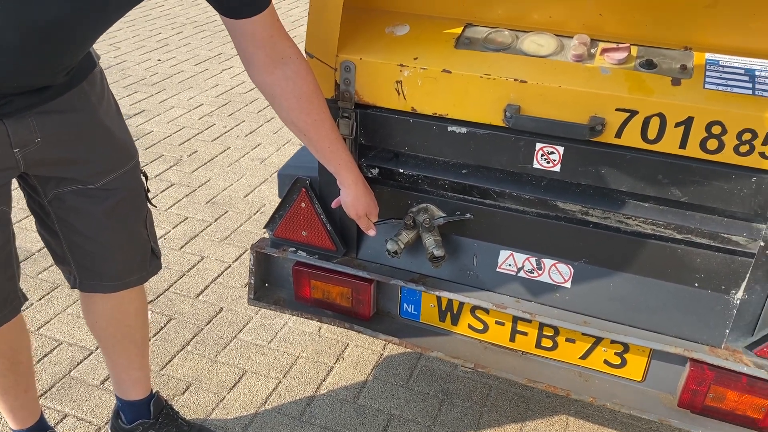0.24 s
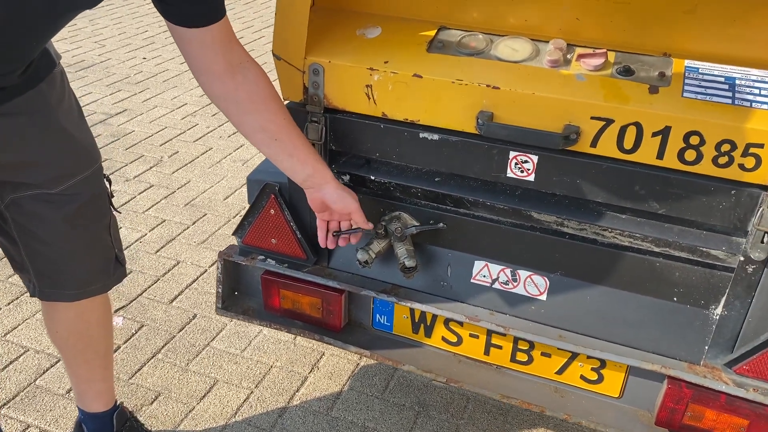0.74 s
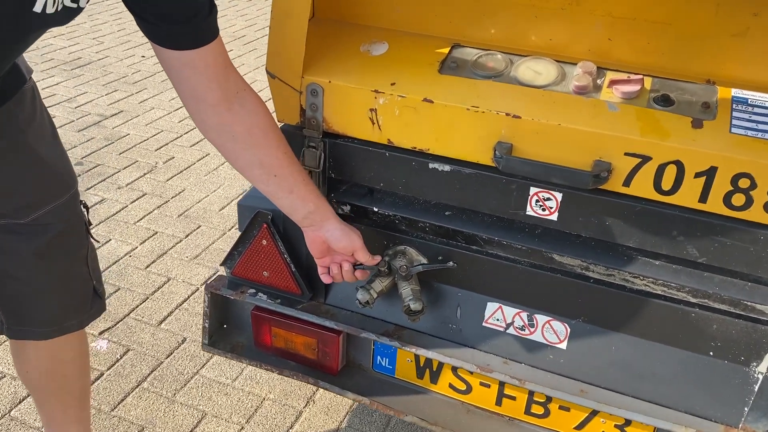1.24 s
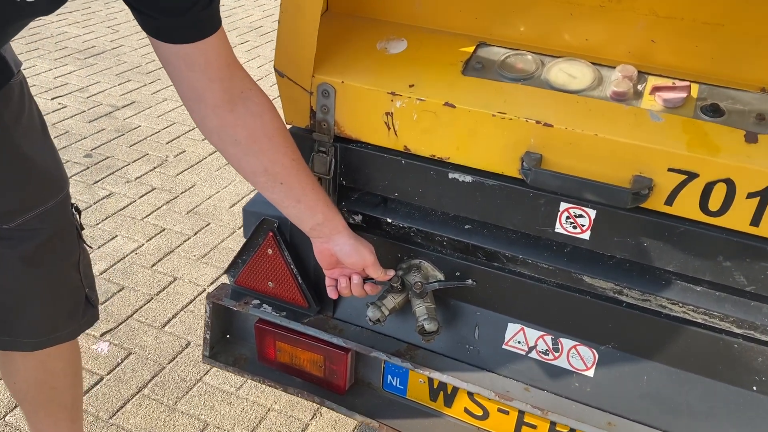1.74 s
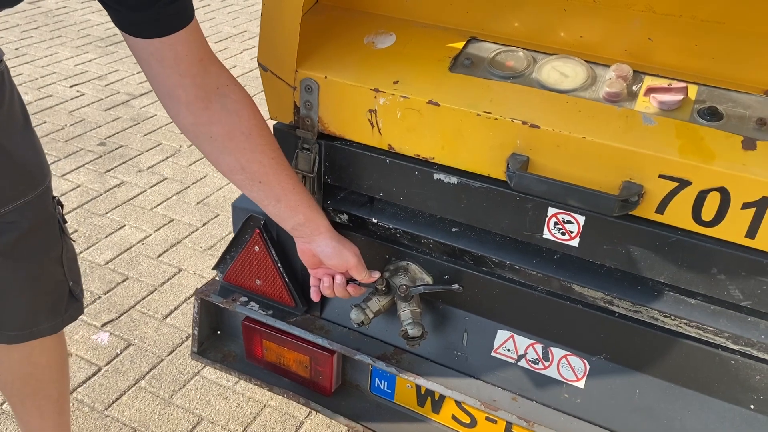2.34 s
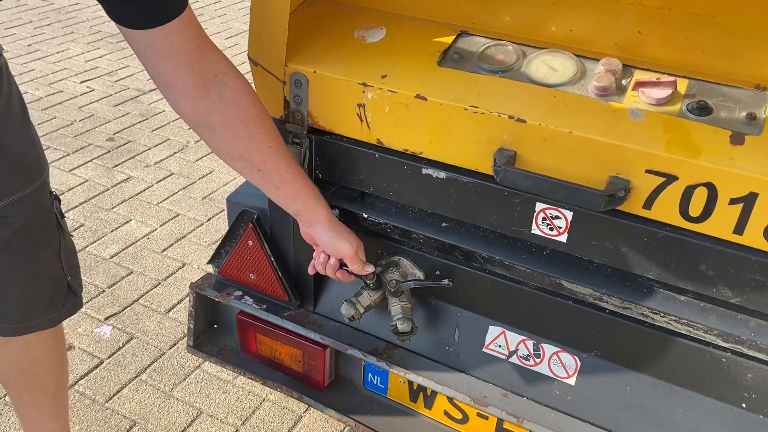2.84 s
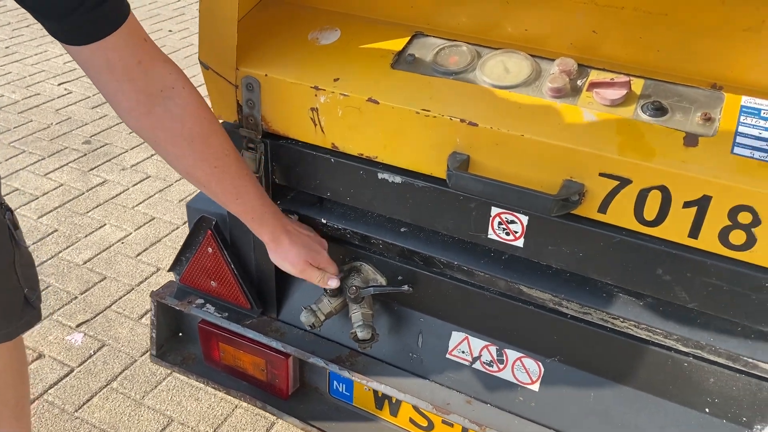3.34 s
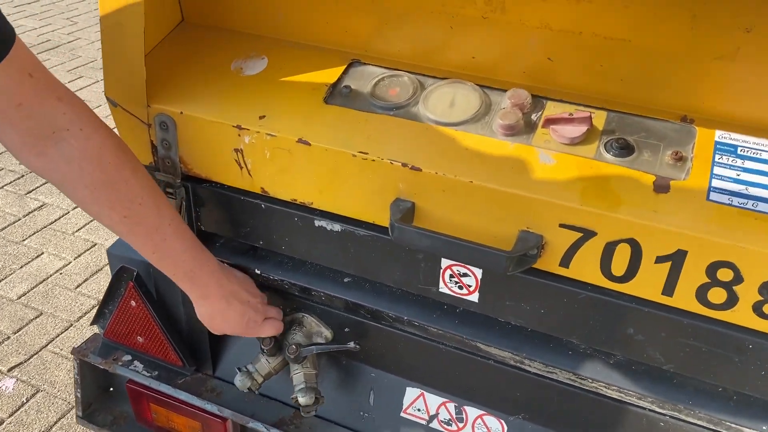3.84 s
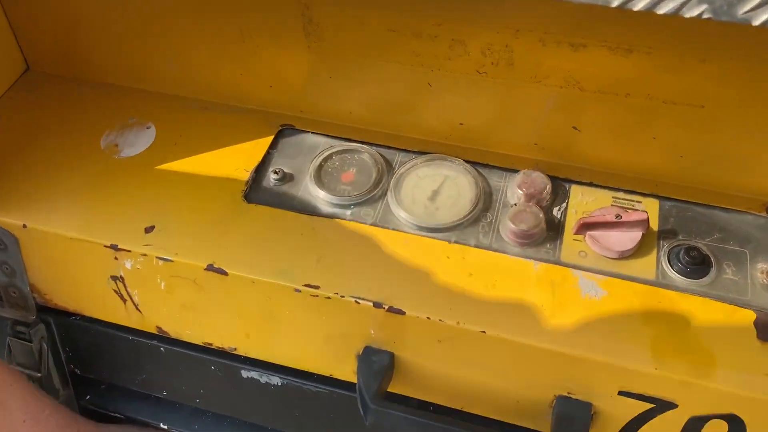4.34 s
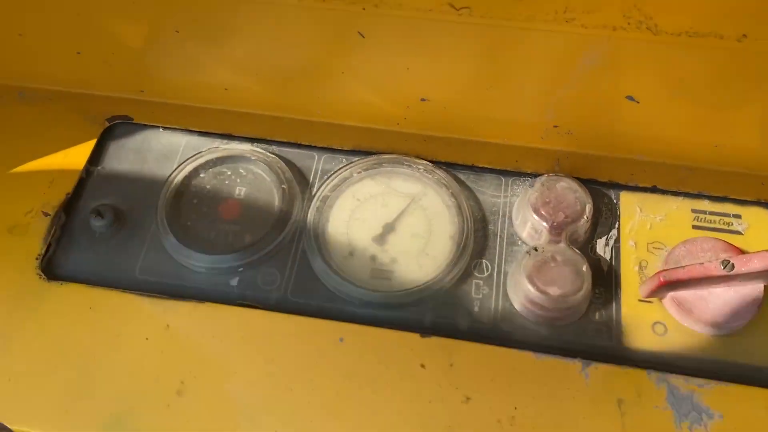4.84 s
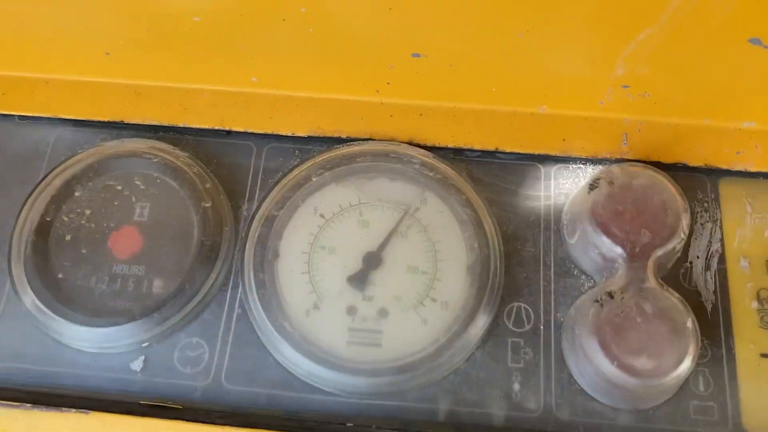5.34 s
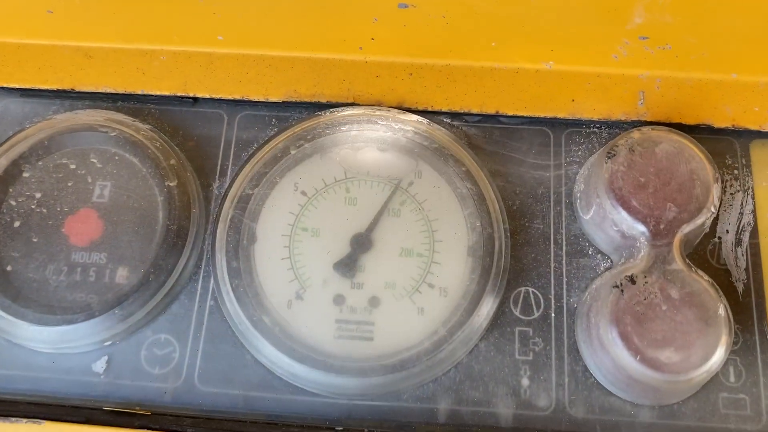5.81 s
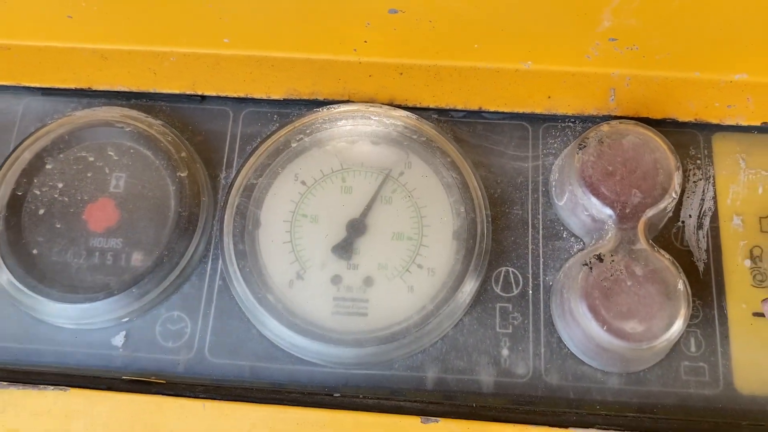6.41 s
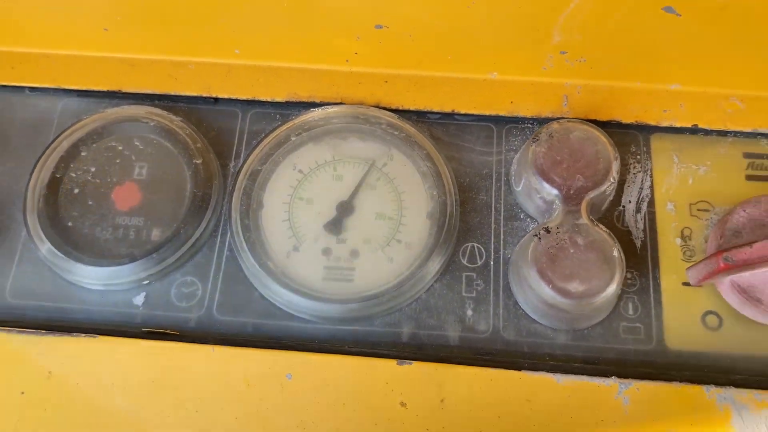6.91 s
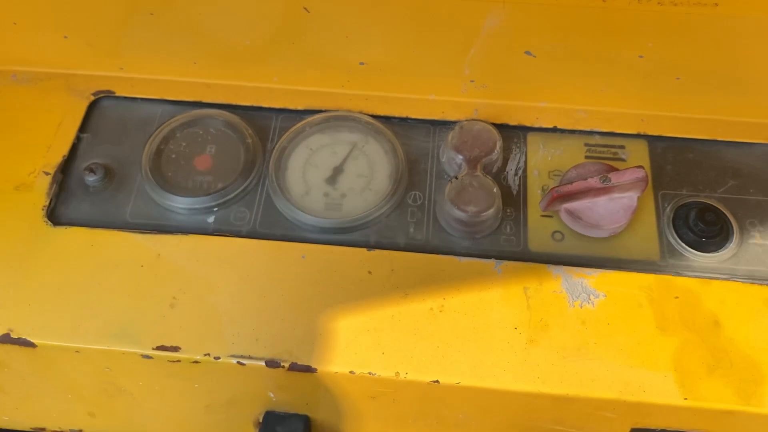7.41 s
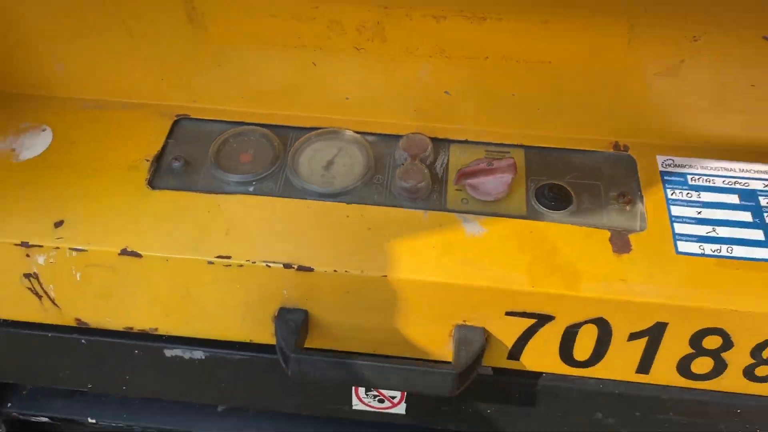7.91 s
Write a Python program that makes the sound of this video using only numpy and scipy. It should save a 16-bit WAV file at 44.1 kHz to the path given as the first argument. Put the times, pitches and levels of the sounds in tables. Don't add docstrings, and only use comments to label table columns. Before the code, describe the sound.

From 0 to about 2.7 s, a loud, steady jet of compressed air roars and hisses from an outlet valve, bright and turbulent with a hollow pipe colour, almost burying a fast-running diesel. From 2.7 s the closing gap makes the jet weaker and more nasal; just before 3.1 s very high thin whistles flare, and everything airy snaps off, leaving only a tiny leak. The small diesel, at first subdued, swells up between 3.1 and 3.7 s, thumping steadily with gear whine. Around 4.4 to 5 s its speed and whine slide down, with a brief surge, into a slow lumpy idle. The stereo microphone moves to the metal housing, so thump, panel rumble, uneven knocking clatter and whine get loud and close from 5 to 7 s. A short, brighter mechanical swell passes near 7 s, then the engine recedes somewhat until 8.2 s, still idling outdoors.

```python
import sys
import numpy as np
from scipy import signal
from scipy.fft import rfft, irfft, next_fast_len
from scipy.io import wavfile
from scipy.ndimage import uniform_filter1d

SR = 44100
rng = np.random.default_rng(int(sys.argv[2]) if len(sys.argv) > 2 else 0)


def materialize(psi):
    bounded = np.clip(np.atleast_2d(psi).T, -1, 1)
    quanta = np.round(bounded * 32767).astype(np.int16)
    wavfile.write(sys.argv[1], SR, quanta)


def amplitude_ratio(level_db):
    exponent = np.asarray(level_db, float) / 20
    return 10 ** exponent


N = 360297
T = np.arange(N) / SR
HZ = np.fft.rfftfreq(1024, 1 / SR)
FRAME_S = np.arange(N // 256 + 5) * 256 / SR

# t/s, rate/(cycles/s)
SPEED = [(0, 22.4), (3.4, 22.38), (4.07, 22.1), (4.4, 21.9), (4.55, 21.0), (4.7, 19), (4.8, 17.4),
         (4.89, 16), (5, 14.7), (5.2, 14.4), (5.5, 14.6), (6.8, 14.54), (7.2, 14.47), (8.17, 14.52)]
# t/s, share/1
NEAR = [
    (4.55, 0),
    (4.69, .92),
    (5.05, 1),
]
VALVE_HZ, HOUSING_HZ = 22.1, 14.55
PATH_CYCLES = .477

# f/Hz, density/dB
JET_COLOUR = [(150, -33.5), (500, -34), (1100, -27.5), (2700, -22.5), (3500, -17), (3900, -6), (6500, -9.5),
              (7700, -13.5), (8000, -1.5), (9500, -7.5), (13000, -8), (15600, -12), (15900, -69)]
# f/Hz, width/Hz, level/dB
JET_MODES = [(1680, 400, 7.5), (2760, 210, -6), (3120, 160, 2), (4070, 300, 6), (4600, 200, 0),
             (5310, 200, 3), (6120, 230, 1.5), (8560, 170, 4.5), (10130, 150, 3.5), (10850, 250, 1.5),
             (12960, 300, 3)]
# f/Hz, likeness/1
JET_SAME = [(700, 1), (1400, 0.88), (2000, .9), (2700, 0.59), (4000, 0.9), (5500, 0.55), (6200, 1),
            (6600, 0.99), (16000, 0.99)]
# f/Hz, level/dB
JET_LEFT = [(1000, -1.5), (2500, 1), (4500, 3.5), (6000, 3.5), (6800, 0.5)]
# t/s, jet level/dB
OPENING = [
    (0, -29),
    (.3, -28.5),
    (2.66, -28),
    (2.74, -31.5),
    (2.99, -34.5),
    (3.075, -38.5),
    (3.09, -53.5),
    (3.12, -57),
    (3.2, -84),
]
# t/s, share/1
CLOSING = [
    (2.62, 0),
    (2.75, 0.7),
    (3.05, 1),
]
# f/Hz, level/dB
NARROWED = [(300, -8.5), (600, -7), (1200, 4), (1700, 11), (2400, -1), (3500, -2), (4400, 3), (5200, -3),
            (6500, -8.5), (9000, 4)]
TOP_DB, TOP_NARROWED_DB, TOP_SHUT_DB = -0.5, -2.5, -5.5
FACING_S, FACING_HALF_S, FACING_DB = 1.9, 0.77, 1.5

# f/Hz, width/Hz, peak level/dB, rise/(dB/s), leak level/dB
WHISTLES = [
    (9600, 54, -34, 169.5, -71),
    (15000, 60, -41, 1200, -74),
]
SHUT_S, CUT_DB_PER_S, LEAK_FADE_DB_PER_S2 = 3.074, 1498, 900

# order of the cycle/1, level/dB
AT_VALVE = [(1, -44), (2, -25), (3, 0.5), (4, -0.5), (5, -12), (6, -27), (7, -16), (8, -15), (9, -16),
            (10, -32), (11, -13.5), (12, -28), (13, -35), (14, -37.5)]
# order of the cycle/1, level/dB
AT_HOUSING = [(1, -54.5), (2, -40.5), (3, -11.5), (4, 0.5), (5, -20), (6, -25), (7, -16), (8, -5.5),
              (9, -34), (10, -37.5), (11, -34), (12, -18.5), (13, -25), (14, -30.5), (15, -22.5), (16, -18),
              (17, -44), (18, -30), (19, -43.5), (20, -40.5)]
# t/s, factor/1
PIPE = [
    (4.45, 1.2),
    (4.65, 1.09),
    (4.9, 1.09),
    (5.1, 0.99),
]
SURGE_S, SURGE_HALF_S, SURGE_DB = 4.66, .06, 3.5
COAST_S, COAST_HALF_S, COAST_DB = 4.72, 0.08, -7.5

# f/Hz, density/dB
RUMBLE = [(30, -28.5), (45, -13.5), (75, -15), (130, -16), (170, -19.5), (240, -21.5), (290, -26),
          (650, -32), (735, -46), (830, -36.5), (1570, -52), (2500, -56), (3300, -89)]
# f/Hz, width/Hz, level/dB
PANELS = [(257, 12, 2), (327.5, 9.2, 4.5), (374.4, 18, 1), (466, 62, 3.5), (517.4, 20, -3.5),
          (574.4, 27, -4.5), (653.3, 8.4, -3), (806, 10, -7), (877, 28, -8), (980, 42, -14.5),
          (1300, 50, -13)]
BLOCK_HZ, BLOCK_DB = (300, 1048), -3.5

# f/Hz, density/dB
CLATTER = [(500, -8.5), (1000, 2), (1800, -4.5), (2300, -4), (3000, -6), (3500, -6), (4200, -10.5),
           (5200, -12.5), (6500, -16.5), (9000, -20.5), (12500, -23.5), (15600, -36.5), (15900, -71)]
# f/Hz, level/dB
FAST_COLOUR = [(700, 4), (1100, -3.5), (1500, 1.5), (2000, -6), (2500, -1), (3400, -1), (4300, 0.5),
               (5200, 3), (6200, -3.5), (8000, 1)]
KNOCKS = [
    (-.25, 1.1),
    (-.03, 1.05),
    (.18, .3),
    (.4, .15),
]
KNOCK_RISE, KNOCK_FALL, KNOCK_LATE = .045, .14, .28

# order of the cycle/1, width/Hz, fast level (weighs 1.5 fast, 0.5 at idle)/dB, level
# added at idle/dB
WHINE = [(28, 9.9, -5, -10.5), (29.4, 12, -8, -18), (42.6, 40, -9, -23), (94, 50, -30.5, -5),
         (59.8, 25, -4, -15.5), (74, 30, -11, -18), (111.7, 27, -5.5, -26.5), (116.5, 40, -5, -21),
         (125, 30, -9, -24.5), (224, 120, -9, -16), (232.4, 150, -5, -9), (340, 310, -12, -8.5),
         (140, 81, -31, 6), (241.6, 110, -28, 5.5)]
# f/Hz, half-width/Hz, level/dB
PANEL_LIFTS = [(520, 28, 11.5), (1260, 45, 5.5), (1430, 35, 9)]

# f/Hz, likeness/1
ENGINE_SAME = [(100, 0.57), (400, 0.63), (800, 0.26), (2000, 0.43), (5500, 0.61), (6600, 0.65),
               (6900, 0.99), (16000, 0.83)]
# f/Hz, level/dB
ENGINE_LEFT = [(1000, -1.5), (4500, 3), (7000, 0.5)]
# t/s, level/dB
CLOSENESS = [(3.66, 0.5), (4.5, 1.5), (4.9, 3), (5.15, 7), (5.75, 9), (6.87, 8), (8.08, 3.5), (8.17, 1)]
# t/s, half-length/s, share/1
VENT_PASSES = [
    (4.3, 0.4, 1.03),
    (5.05, .12, .7),
    (7.05, .25, 1.1),
]
# far/dB, held down under the jet/dB, closeness share/1, idle change/dB, vent/dB
THUMP_LAW = (-33.5, -18, 1.03, -0.03, 0.3)
RUMBLE_LAW = (-61.5, -17, 1.7334, -0.47, 2)
CLATTER_LAW = (-59.5, -9, 0.9348, -9.5, 1.5)
WHINE_LAW = (-62.5, -10.5, .4, -4.5, 4.5)
RELEASE_S, RECOVERY_S, CREEP_DB_PER_S = 2.98, 0.65, 0.94
HUSH_S, HUSH_HALF_S, HUSH_DB = 3.2, .3, -21
HUSH_BELOW_HZ, HUSH_SHARE = 1200, 0.3

# f/Hz, phase/rad
RIGHT_TURN = [(0, 0), (1300, -.1), (2500, -.05), (4300, -.4), (5800, -.1), (7100, 0), (8900, 3.14),
              (9200, 3.14), (11000, 6.28), (11500, 6.28), (13150, 9.42), (13600, 9.42), (15000, 12.4),
              (16000, 12.56)]
MONO_EDGE_HZ, MONO_SINK_S, MONO_SINK_HZ_PER_S, MONO_JITTER_HZ = 1170, 2.98, 307, 50


def evened(x):
    return x / np.sqrt(np.mean(x ** 2) + 1e-20)


def read(points, hz):
    f, value = np.transpose(points)
    return np.interp(np.log(hz + 1), np.log(f + 1), value)


def curve(rows, column=1, t=T):
    rows = np.asarray(rows, float)
    return np.interp(t, rows[:, 0], rows[:, column])


def bump(s, half_s, t=T):
    return np.exp(-((t - s) / half_s) ** 2)


def wander(rate, t=T):
    return evened(np.interp(t, np.arange(200) / rate, rng.standard_normal(200)))


def noise(field_db, same, left_db, patchy_db, streaky_db, flicker_db):
    a, b, c, d, patch, streak, flick = rng.standard_normal((len(FRAME_S), len(HZ), 7)).T
    patch = uniform_filter1d(uniform_filter1d(patch, size=10, axis=0), size=6, axis=1)
    streak = uniform_filter1d(uniform_filter1d(streak, size=2, axis=0), size=40, axis=1)
    flick = uniform_filter1d(flick, size=240, axis=0)
    rough_db = patchy_db * evened(patch) + streaky_db * evened(streak) + flicker_db * evened(flick)
    like = np.clip(read(same, HZ), -1, 1)[:, None]
    tilt = amplitude_ratio(read(left_db, HZ) / 2)[:, None]
    left = a + 1j * b
    right = like * left + np.sqrt(1 - like ** 2) * (c + 1j * d)
    z = np.array([tilt * left, right / tilt]) * amplitude_ratio(field_db + rough_db)
    return evened(signal.istft(z, nperseg=1024, noverlap=768)[1][:, :N])


def fuzzy_line(turns, width):
    slow, r = np.arange(N // 32 + 2) * 32, np.exp(-np.pi * width * 32 / SR)
    parts = signal.lfilter([1], [1, -2 * r, r * r], rng.standard_normal((4, len(slow))))
    a, b, c, d = (np.interp(np.arange(N), slow, p) for p in evened(parts))
    cos, sin = np.cos(2 * np.pi * turns), np.sin(2 * np.pi * turns)
    return (a + 25 / width) * cos + b * sin, c * cos + d * sin


def cycles(near):
    return np.cumsum(curve(SPEED)) / SR - .04 - PATH_CYCLES * near


def heard_db(far_db, held_db, close, idle_db, vent_db):
    held = np.clip(1 - (T - RELEASE_S) / RECOVERY_S, 0, 1)
    creep_db = CREEP_DB_PER_S * np.minimum(T - RELEASE_S, 0)
    idle = np.clip((VALVE_HZ - curve(SPEED)) / (VALVE_HZ - HOUSING_HZ), 0, 1)
    vent = sum(share * bump(s, half_s) for s, half_s, share in VENT_PASSES)
    return far_db + held_db * held + creep_db + close * curve(CLOSENESS) + idle_db * idle + vent_db * vent


def jet():
    pipe_db = 0
    for hz, width, db in JET_MODES:
        mode_hz = hz * (1 + 0.0074 * wander(rate=3, t=FRAME_S))
        pipe_db = pipe_db + db / (1 + (2 * (HZ[:, None] - mode_hz) / width) ** 2)
    narrow = curve(CLOSING, t=FRAME_S)
    top_db = TOP_DB + TOP_NARROWED_DB * narrow + FACING_DB * bump(FACING_S, FACING_HALF_S, FRAME_S)
    top_db += TOP_SHUT_DB * np.clip((FRAME_S - SHUT_S) / 0.063 + 1, 0, 1)
    top = np.clip((HZ - 7000) / 1200, 0, 1)
    field_db = read(JET_COLOUR, HZ)[:, None] + pipe_db + top[:, None] * top_db
    field_db += read(NARROWED, HZ)[:, None] * narrow
    air = noise(field_db, JET_SAME, JET_LEFT, patchy_db=1.0, streaky_db=2.5, flicker_db=0.56)
    air /= np.std(signal.lfilter(*signal.butter(3, [3300, 7300], "bandpass", fs=SR), air))
    shut = np.clip((3.17 - T) / .09, 0, 1)
    return amplitude_ratio(curve(OPENING) + 0.77) * air * shut


def thump():
    near = curve(NEAR, t=FRAME_S)
    turns_valve, turns_housing = cycles(near=0), cycles(near=0.97)
    pitch = curve(SPEED, t=FRAME_S) / curve(PIPE, t=FRAME_S)
    at_valve = [(k * VALVE_HZ, db) for k, db in AT_VALVE]
    at_housing = [(k * HOUSING_HZ, db) for k, db in AT_HOUSING]
    coast_db = COAST_DB * bump(COAST_S, COAST_HALF_S, FRAME_S)
    out, power = np.zeros(N), 0
    for k in range(2, 21):
        sway = amplitude_ratio(1.6 * wander(rate=6, t=FRAME_S) * (k > 4) + coast_db * (k > 9))
        far = (1 - near) * sway * amplitude_ratio(read(at_valve, k * VALVE_HZ))
        close = near * sway * amplitude_ratio(read(at_housing, k * pitch))
        trail = np.sqrt(max(k - 4, 0))
        chance = (k > 8) * 2 * np.pi * rng.random()
        valve_wave = np.cos(2 * np.pi * k * turns_valve - 1.04 * trail - chance)
        housing_wave = np.sin(2 * np.pi * k * turns_housing - 0.24 * trail - chance)
        out += np.interp(T, FRAME_S, far) * valve_wave + np.interp(T, FRAME_S, close) * housing_wave
        power += (far ** 2 + close ** 2) / 2
    level_db = heard_db(*THUMP_LAW) + SURGE_DB * bump(SURGE_S, SURGE_HALF_S)
    out *= amplitude_ratio(level_db) / np.interp(T, FRAME_S, np.sqrt(power))
    wide = amplitude_ratio(-24.5) * np.roll(out, 190)
    return np.array([out + wide, out - wide])


def rumble():
    near = curve(NEAR)
    fired = np.diff(np.floor(cycles(near)), prepend=0) * amplitude_ratio(.6 * rng.standard_normal(N))
    ring = np.zeros((2, 9000))
    for (hz, width, db), (moment, turn) in zip(PANELS, rng.random((len(PANELS), 2))):
        t = np.maximum(np.arange(9000) / SR - .068 * moment, 0)
        shape = np.sqrt(width) * np.exp(-np.pi * width * t) * np.minimum(t / 0.0041, 1)
        ring += amplitude_ratio(db) * shape * np.sin(2 * np.pi * hz * t + [[0], [hz / 600 * turn]])
    knock = evened(signal.oaconvolve(fired[None], ring, axes=1)[:, :N])
    shake = noise(read(RUMBLE, HZ)[:, None], ENGINE_SAME, ENGINE_LEFT,
                  patchy_db=-0.5, streaky_db=1.5, flicker_db=1.5)
    shake /= np.std(signal.lfilter(*signal.butter(2, [270, 1100], "bandpass", fs=SR), shake))
    pattern = signal.lfilter(*signal.butter(2, BLOCK_HZ, "bandpass", fs=SR), rng.standard_normal(2000))
    block = evened(signal.oaconvolve(fired, pattern)[:N])
    mix = amplitude_ratio(-2.5 - 4.5 * (1 - near)) * knock + amplitude_ratio(-4.0) * shake + amplitude_ratio(BLOCK_DB) * (1 - near) * block
    return amplitude_ratio(heard_db(*RUMBLE_LAW) + HUSH_DB * bump(HUSH_S, HUSH_HALF_S)) * mix


def clatter():
    near = curve(NEAR)
    turns = cycles(near)
    beat = 0
    for moment, size in KNOCKS:
        since = (turns - moment - KNOCK_LATE * (1 - near)) % 1
        beat = beat + size * np.minimum(since / KNOCK_RISE, 1) * np.exp(-since / KNOCK_FALL)
    strength = amplitude_ratio(1.4 * rng.standard_normal(200))[np.floor(turns + .4).astype(int) + 1]
    ticks = signal.lfilter([1], [1, -.99], (rng.random(N) < 150 / SR) * rng.exponential(.4, N))
    field_db = read(CLATTER, HZ)[:, None] + read(FAST_COLOUR, HZ)[:, None] * (1 - curve(NEAR, t=FRAME_S))
    field_db += HUSH_SHARE * HUSH_DB * bump(HUSH_S, HUSH_HALF_S, FRAME_S) * (HZ < HUSH_BELOW_HZ)[:, None]
    rattle = noise(field_db, ENGINE_SAME, ENGINE_LEFT, patchy_db=0.0, streaky_db=3.0, flicker_db=1.0)
    flare = 1 + (0.28 + 1.8 * near) * beat * strength + 0.66 * ticks
    return amplitude_ratio(heard_db(*CLATTER_LAW) - 2.5) * rattle * flare


def whine():
    speed, frame_speed, out = curve(SPEED), curve(SPEED, t=FRAME_S), np.zeros((2, N))
    idle = np.clip((17.3 - speed) / 2.6, 0, 1) ** 1.1
    hush_db = HUSH_SHARE * HUSH_DB * bump(HUSH_S, HUSH_HALF_S, FRAME_S)
    for order, width, fast_db, idle_db in WHINE:
        line_hz = order * speed * (1 + (.003 + .012 * idle) * wander(rate=4))
        own, other = fuzzy_line(np.cumsum(line_hz) / SR, width)
        left = amplitude_ratio(3.3 * min(order / 231, 1))
        lift_db = sum(db * bump(hz, half_hz, order * frame_speed) for hz, half_hz, db in PANEL_LIFTS)
        lift_db += hush_db * (order * VALVE_HZ < HUSH_BELOW_HZ)
        level_db = np.interp(T, FRAME_S, lift_db) + (1.5 - idle) * fast_db + idle * idle_db
        out += amplitude_ratio(level_db) * np.array([left * own, (0.7 * own + 0.48 * other) / left])
    return amplitude_ratio(heard_db(*WHINE_LAW)) * out


def whistles():
    before, after, out = np.maximum(SHUT_S - T, 0), np.maximum(T - SHUT_S, 0), 0
    for hz, width, peak_db, rise_db_per_s, leak_db in WHISTLES:
        tone = amplitude_ratio(peak_db - rise_db_per_s * before - CUT_DB_PER_S * after)
        leak = amplitude_ratio(leak_db - LEAK_FADE_DB_PER_S2 * after ** 2) * (after > 0)
        out = out + (tone + leak) * fuzzy_line(hz * T, width)[0]
    return out


def scene():
    return jet() + thump() + rumble() + clatter() + whine() + whistles()


def mono_bass(x):
    hz, t, z = signal.stft((x[0] - x[1]) / 2, SR, nperseg=2048)
    edge_hz = MONO_EDGE_HZ - MONO_SINK_HZ_PER_S * np.maximum(t - MONO_SINK_S, 0)
    edge_hz += MONO_JITTER_HZ * rng.standard_normal(len(t))
    side = signal.istft(z * (hz[:, None] > edge_hz), SR, nperseg=2048)[1][:N]
    return x.mean(0) + np.array([side, -side])


def roll_off(x):
    return signal.sosfilt(signal.butter(12, 17000, fs=SR, output="sos"), x)


def record(dry):
    size = next_fast_len(N)
    hz = np.fft.rfftfreq(size, 1 / SR)
    turn = np.exp(1j * np.interp(hz, *np.transpose(RIGHT_TURN)))
    cut = 1 / np.sqrt(1 + (39 / (hz + 1)) ** 16)
    ports = irfft(rfft(dry, size) * cut * [np.ones(len(hz)), turn], size)[:, :N]
    return roll_off(mono_bass(ports))


dry = scene()
out = record(dry)
materialize(out)
```